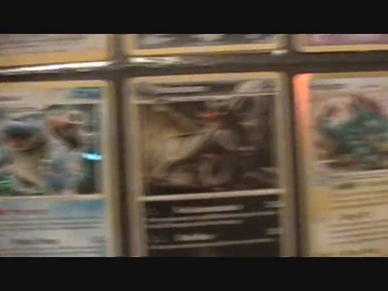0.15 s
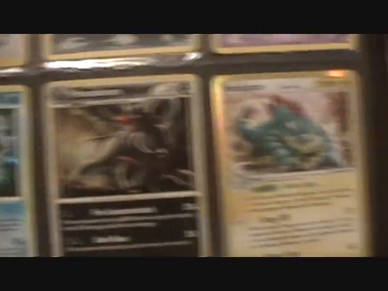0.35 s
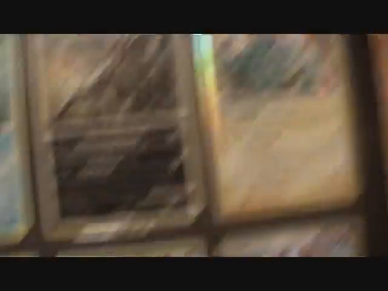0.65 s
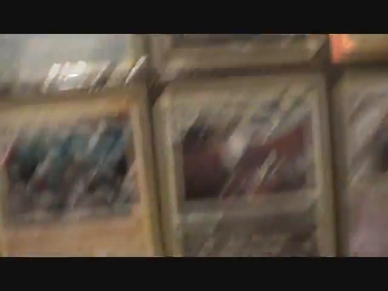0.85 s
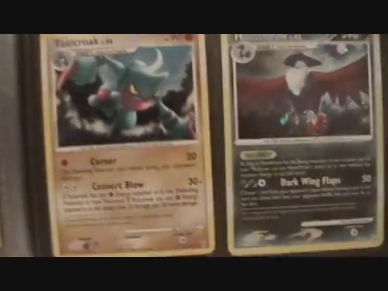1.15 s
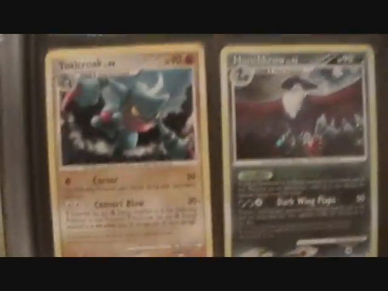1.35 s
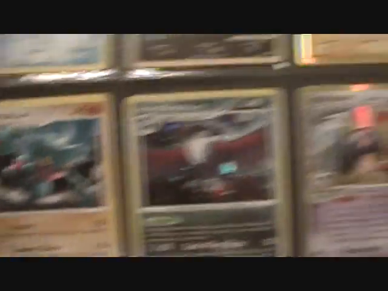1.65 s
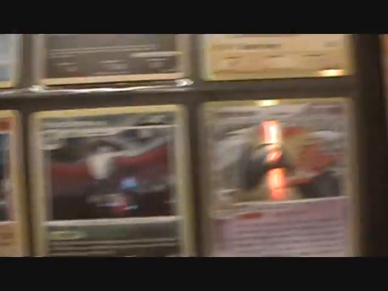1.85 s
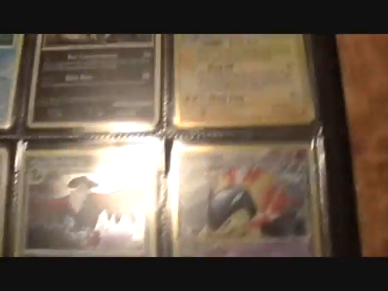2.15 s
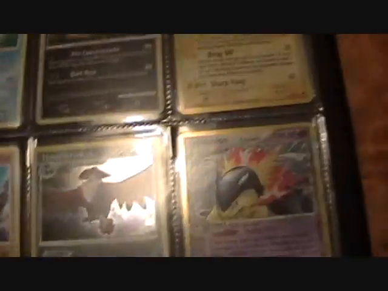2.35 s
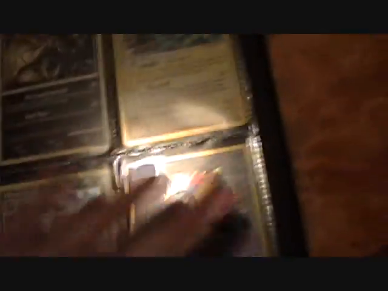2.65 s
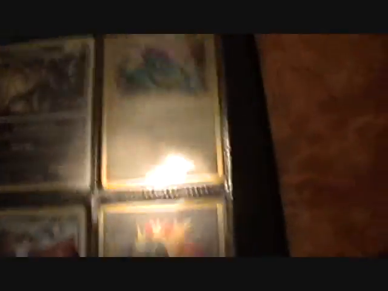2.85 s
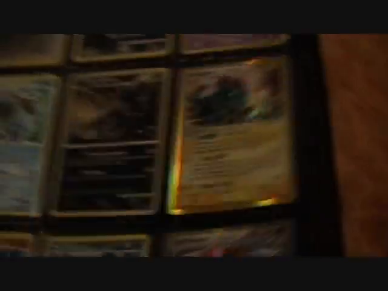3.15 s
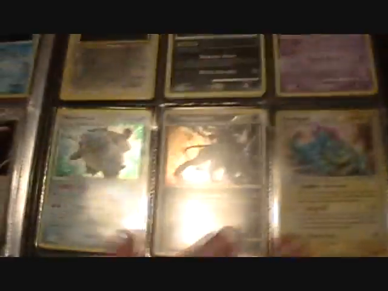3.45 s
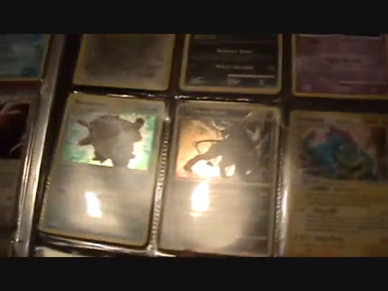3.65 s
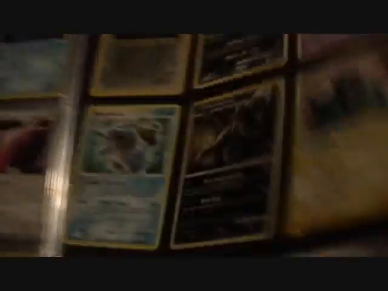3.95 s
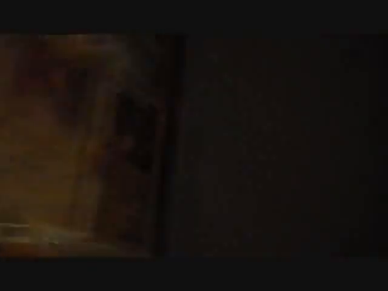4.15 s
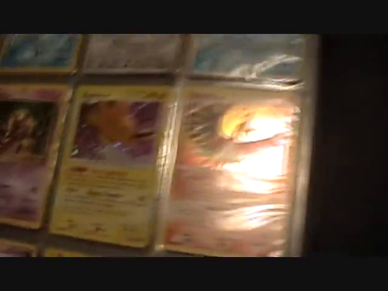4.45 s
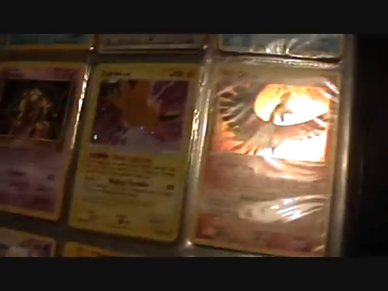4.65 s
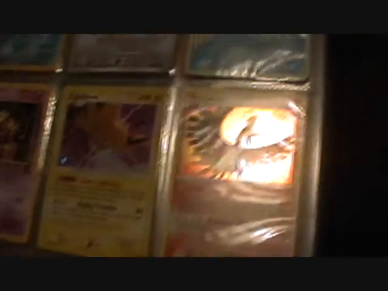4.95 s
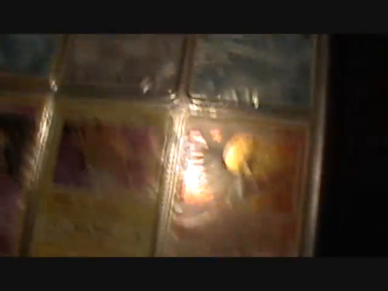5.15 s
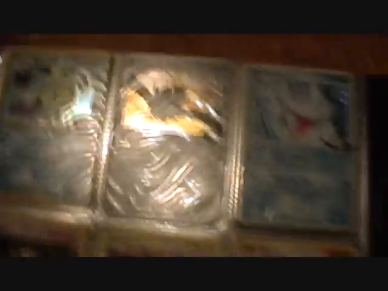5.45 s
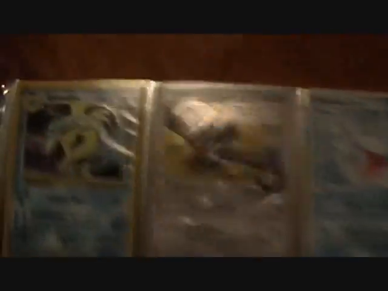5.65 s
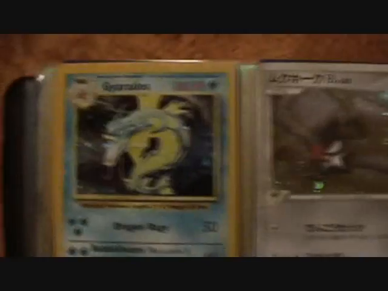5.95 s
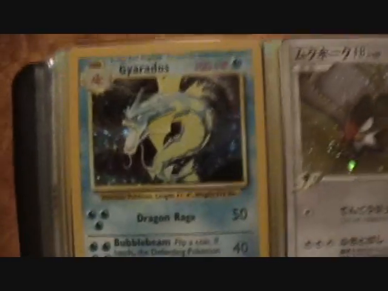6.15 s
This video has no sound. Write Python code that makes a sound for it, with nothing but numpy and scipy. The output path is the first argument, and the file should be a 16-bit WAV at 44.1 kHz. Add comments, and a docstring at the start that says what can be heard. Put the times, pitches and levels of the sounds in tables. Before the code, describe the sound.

Someone leafs through stiff plastic binder pages beside a small camera microphone. Continuous buzzy ticking and hiss lie under muffled handling knocks. After about two seconds of mostly bumps and light sliding, sleeves snap sharply and crinkle in bursts, pages landing with soft low thumps. The small dry room adds a short tail; the last rustles die away over the drive noise.

```python
"""A hand turns the plastic sleeve pages of a card binder in a quiet room, close to a hand-held tape camcorder.
From the start the tape drive whirs and ticks (filtered noise, sines, struck modes) while the grip rumbles and
bumps (lumpy noise, short wave packets). After 1 s a fingertip squeaks and a first sleeve snaps; fingers then
slide (dense grains). From 2.2 s to 5.3 s sleeves crinkle and snap (ringing buckles), and until 4.6 s pages drop
on the binder (damped modes). The last strokes and flexing fade before 6 s; drive and grip go on to the end."""
import sys
import numpy as np
from scipy import signal
from scipy.fft import rfft, irfft
from scipy.io import wavfile
from scipy.ndimage import uniform_filter1d

SR = 44100
rng = np.random.default_rng(int(sys.argv[2]) if len(sys.argv) > 2 else 0)


def generate_wav(signal):
    """Clip the signal to [-1, 1] and save it as 16-bit WAV at the path in sys.argv[1]."""
    frames = np.transpose(np.atleast_2d(signal))
    scaled = np.clip(frames, -1, 1) * 32767
    pcm = np.round(scaled).astype(np.int16)
    wavfile.write(sys.argv[1], SR, pcm)


N = 278403


def gain_of(db):
    """Decibel law: 20 dB is a factor of ten in amplitude."""
    return 10 ** (np.asarray(db) / 20)


def evened(x):
    """Power normalisation: scales to rms 1."""
    return x / np.sqrt(np.mean(x ** 2) + 1e-20)


def peaked(x):
    """Peak normalisation: scales to a largest excursion of 1."""
    return x / abs(x).max()


def read(points, hz):
    """Interpolation of a spectrum on a logarithmic frequency axis."""
    f, value = np.transpose(points)
    return np.interp(np.log(hz + 1), np.log(f + 1), value)


def level(rows, column):
    """Amplitude envelope: a dB column becomes gain over time, near silence outside the rows."""
    rows = np.asarray(rows)
    level_db = np.interp(np.arange(N) / SR, rows[:, 0], rows[:, column], left=-120, right=-120)
    return uniform_filter1d(gain_of(level_db), size=441)


def add(mix, s, sound):
    """Superposition: mixes a sound in at time s."""
    part = mix[..., round(max(s, 0) * SR):][..., :sound.shape[-1]]
    part += sound[..., :part.shape[-1]]


def resonate(x, hz, width):
    """Damped resonance: one complex pole, about unit gain at its peak; the bandwidth sets the decay."""
    r = np.exp(-np.pi * width / SR)
    return 2 * signal.lfilter([1 - r], [1, -r * np.exp(2j * np.pi * hz / SR)], x).real


def coloured(x, points):
    """Spectral shaping: weights each frequency, then sets rms 1."""
    gain = gain_of(read(points, np.fft.rfftfreq(x.shape[-1], 1 / SR)))
    return evened(irfft(rfft(x) * gain, x.shape[-1]))


# coherence of two close microphones: f/Hz, left-right correlation (0-1)
COHERENCE = [(60, 1), (500, 0.912), (2000, 0.4), (8000, 0.32)]


def pair(make):
    """Spatial coherence: two close microphones hear alike in the bass, less so in the treble."""
    mid, side = make(), make()
    same = np.clip(read(COHERENCE, np.fft.rfftfreq(N, 1 / SR)), 0, 1)
    side = irfft(rfft(side) * np.sqrt((1 - same) / (1 + same)), N)
    return np.array([mid + side, mid - side])


def grains(per_s, spread_db):
    """Shot noise: clicks at random times, a few of them large."""
    size = gain_of(spread_db * np.minimum(rng.exponential(1, N), 5))
    return size * rng.standard_normal(N) * (rng.random(N) < per_s / SR)


# reverberation time of the room: f/Hz, t60/s
ROOM_T60 = [(300, 0.39), (2000, 0.23), (12000, 0.1)]


def room(x):
    """Reverberation: sparse taps of random sign, each band dying exponentially at its own speed."""
    taps = np.zeros((2, SR // 2))
    at = np.arange(200, SR // 2 - 20, 20)
    at = at + rng.integers(0, 20, (2, len(at)))
    np.put_along_axis(taps, at, rng.choice([-1., 1.], at.shape), 1)
    hz, t, bands = signal.stft(taps, SR, nperseg=256)
    decay = gain_of(-60 * t / read(ROOM_T60, hz)[:, None])
    tail = signal.istft(bands * decay, SR, nperseg=256)[1]
    tail = tail + .8 * tail[::-1]  # the two sides share much of the tail
    return signal.fftconvolve(x, tail / np.linalg.norm(tail[0]), axes=1)[:, :N]


# spectrum of the steady hiss: f/Hz, relative level per Hz/dB
HISS_SPECTRUM = [(88, -45), (150, 1.0), (563, -1.0), (633, -15), (848, -4.5), (990, -20.0), (1180, -17),
                 (2000, -22), (2780, -18), (4700, -24), (15700, -30.0), (16000, -72)]
# fuzzy whistles of the tape drive: f/Hz, bandwidth/Hz, relative level/dB
HOUSING_MODES = [(580, 2.2, -6), (810, 22, -30), (1171, 4.1, -1.5), (1630, 140, 0.5), (2260, 34, -5.5),
                 (3500, 640, -1.5), (5800, 100, -9)]
# steady tones: f/Hz, rms level/dB
STEADY_TONES = [(59.2, -61.5), (15735, -82)]
# modes rung by each head touch: f/Hz, bandwidth/Hz, rms level/dB
TICK_MODES = [(570, 50, -62), (820, 100, -67), (1170, 60, -70), (2740, 130, -67), (3270, 250, -73),
              (3750, 260, -71), (4230, 300, -72)]
HISS_DB, HOUSING_DB = -54, -66.5
TOUCHES_HZ, FIRST_STRONG_S, WEAK_DB = 59.94, .0231, -5  # the second head touches more lightly
WHINE_HZ, WHINE_DB, WHINE_DEPTH = 13754, -82, .7  # rms level before the throb; depth 0-1


def camcorder():
    """Forced vibration: hiss, resonant whirring, tones and modes struck by two heads, strong then weak."""
    t = np.arange(N) / SR
    hiss = gain_of(HISS_DB) * pair(lambda: coloured(rng.standard_normal(N), HISS_SPECTRUM))
    noise = rng.standard_normal(N)
    whir = evened(sum(gain_of(db) * evened(resonate(noise, hz, width)) for hz, width, db in HOUSING_MODES))
    tones = sum(np.sqrt(2) * gain_of(db) * np.sin(2 * np.pi * hz * t) for hz, db in STEADY_TONES)

    touches = (t - FIRST_STRONG_S) * TOUCHES_HZ
    throb = 1 + WHINE_DEPTH * np.cos(np.pi * touches)  # once a drum turn, two touches
    whine = np.sqrt(2) * gain_of(WHINE_DB) * throb * np.sin(2 * np.pi * WHINE_HZ * t)

    touch = np.floor(touches).astype(int) + 2
    force_db = 1.5 * rng.standard_normal(touch.max() + 1)[touch] + WEAK_DB * (touch % 2)
    impact = np.diff(touch, prepend=touch[0])
    scrape = .03 * np.exp(-(touches % 1) / .1) * rng.standard_normal(N)
    knock = gain_of(force_db) * (impact + scrape)
    ticks = sum(gain_of(db) * evened(resonate(resonate(knock, hz, width), hz, 2 * width))
                for hz, width, db in TICK_MODES)
    return hiss + gain_of(HOUSING_DB) * whir + tones + whine + ticks


# hand shifting on the camera body: t/s, deep rumble level/dB, upper rumble level/dB
GRIP_LEVELS = [(0.0, -48, -49), (0.26, -50.5, -57), (0.37, -46.5, -55.5), (0.67, -56, -51),
               (0.79, -40, -49), (1.02, -52, -53), (1.23, -58, -58.5), (1.49, -48, -59), (1.67, -45.5, -57),
               (2.02, -50.5, -50), (2.35, -58, -44.5), (2.95, -56, -46.5), (3.41, -58, -44.5),
               (3.67, -76, -56), (3.95, -66, -53), (4.22, -41, -44), (4.32, -48, -45), (4.46, -49.5, -55),
               (4.73, -71, -57), (5.06, -63, -63), (5.34, -47.5, -49), (5.46, -39, -57), (5.82, -52, -49.5),
               (6.31, -44, -65)]
# grip bumps on the camera body: t/s, envelope peak level/dB, f/Hz at the peak
GRIP_BUMPS = [(0.034, -28, 204), (0.308, -19.5, 217), (0.607, -20.5, 139.5), (0.705, -26, 133.5),
              (0.811, -28, 218), (0.842, -24, 157), (1.028, -27.5, 141), (1.561, -14.5, 192),
              (1.614, -13.5, 128), (1.656, -20, 126), (1.764, -14.5, 224), (2.09, -27.5, 98.5),
              (2.223, -19, 290), (2.336, -26.5, 118), (2.461, -17.5, 320), (2.988, -35, 174),
              (3.203, -24.5, 163), (3.24, -28, 172), (3.418, -26, 182), (3.446, -28, 198),
              (4.268, -40, 420), (4.307, -22.5, 174), (4.406, -25, 287), (4.55, -25.5, 400),
              (4.718, -37, 109)]
LUMP_SPREAD_DB = 2.2  # how unequal the lumps of the upper rumble are


def grip():
    """Structure-borne sound: lumpy rumble and bumps of a few cycles carried through the camera body."""
    deep_spectrum = [(25, -41), (50, -9), (90, -16.0), (150, -24.5), (400, -81)]  # f/Hz, level/dB
    upper_spectrum = [(60, -17.5), (110, -2.5), (220, -4.5), (400, -6.0), (700, -52.5), (3000, -95.5)]
    deep = pair(lambda: coloured(rng.standard_normal(N), deep_spectrum))
    upper = pair(lambda: coloured(grains(900, LUMP_SPREAD_DB), upper_spectrum))
    out = level(GRIP_LEVELS, 1) * deep + level(GRIP_LEVELS, 2) * upper
    t = np.arange(N) / SR
    # rubbing around each bump, borrowed from the time-reversed rumble
    scuffle = sum(gain_of(db - 19.0) * np.exp(-abs(t - s - .01) / 0.023) for s, db, hz in GRIP_BUMPS)
    out += scuffle * upper[:, ::-1]
    for s, db, hz in GRIP_BUMPS:
        u = np.arange(-1.5, 4, hz / SR)  # time in cycles
        shape = np.where(u < 0, np.exp(-(u / 0.57) ** 2), np.exp(-(u / 0.39) ** 0.63))
        wave = np.sin(2 * np.pi * (u + 0.023) * (1 - 0.02 * u))  # pitch glides slightly down
        add(out, s, gain_of(db) * shape * wave)
    return out


# pages landing on the binder: t/s, peak level/dB, t60/s of the blow
PAGE_DROPS = [(2.232, -20.5, 0.23), (2.464, -14.5, 0.18), (3.5, -27.5, 0.12), (4.271, -20.5, 0.054),
              (4.551, -25.5, 0.19)]
# modes of the binder: f/Hz, bandwidth/Hz, relative level/dB
BINDER_MODES = [(310, 69, 13), (418, 119, 10.5), (515, 130, -22), (796, 160, -1)]


def drops():
    """Modal excitation: a soft uneven blow rings the damped modes of the binder."""
    out, t = np.zeros(N), np.arange(SR // 3) / SR
    for (s, db, t60), noise in zip(PAGE_DROPS, rng.standard_normal((len(PAGE_DROPS), len(t)))):
        blow = noise * gain_of(-60 * t / t60) * np.minimum(t / 0.0017, 1)
        ring = sum(gain_of(mode_db) * resonate(resonate(blow, hz, width), hz, 2 * width)
                   for hz, width, mode_db in BINDER_MODES)
        add(out, s, gain_of(db) * peaked(ring))
    return out


# a short rub: t/s, length/s, rms level/dB before its fades, modes (f/Hz, bandwidth/Hz, relative level/dB)
FINGER_SQUEAK = (1.02, 0.0336, -50.5, [(1450, 470, -1), (2260, 290, -6.5)])


def squeak():
    """Friction-driven resonance: a fingertip catches briefly on the plastic."""
    s, length, db, modes = FINGER_SQUEAK
    noise, out = rng.standard_normal(SR // 10)[:round(length * SR)], np.zeros(N)
    rub = evened(sum(gain_of(g) * resonate(resonate(noise, hz, width), hz, width) for hz, width, g in modes))
    add(out, s, gain_of(db) * rub * signal.windows.tukey(len(rub), .4))
    return out


# spectrum of crinkling plastic: f/Hz, relative level per Hz/dB
CRINKLE_SPECTRUM = [(500, 20.5), (900, 8), (2000, 9), (3600, 9.5), (5000, 0), (8000, -5.5), (12000, -46)]
# spectrum of skin sliding on plastic: f/Hz, relative level per Hz/dB
SLIDE_SPECTRUM = [(3000, 3.5), (5500, 6), (10000, 4), (13000, 3.5), (14200, -6.5), (15400, 7), (15900, -42)]
# strokes of fingers and pages over the plastic: t/s mid-rise, hold/s, crinkle level/dB, slide hiss level/dB
PLASTIC_STROKES = [(1.576, 0.065, -53, -79), (1.945, 0.21, -55, -48), (2.328, 0.094, -42, -58),
                   (2.384, 0.02, -39.5, -48), (2.431, 0.056, -46, -53), (2.831, 0.093, -68, -47),
                   (2.944, 0.083, -50, -53.5), (3.286, .04, -43.5, -52), (3.498, 0.027, -43.5, -52),
                   (3.688, 0.11, -75, -54), (4.22, 0.055, -75, -53), (4.413, 0.013, -40.5, -45.5),
                   (4.779, 0.077, -56, -62), (5.133, 0.11, -52.5, -56), (5.314, 0.033, -49, -55),
                   (5.381, 0.068, -46, -56), (5.503, 0.098, -53, -71)]
# pages flexing in the hand: t/s, crinkle level/dB
PAGE_FLEX = [(2.56, -84), (2.64, -60), (2.76, -60.5), (2.82, -63), (3.08, -67), (3.2, -61), (3.4, -55.5),
             (3.6, -59.5), (3.95, -60.5), (4.05, -60.5), (4.12, -57.5), (4.35, -57.5), (4.5, -67),
             (4.57, -56), (4.72, -56.5), (4.95, -61.5), (5.08, -63), (5.68, -65.5)]
FLEX_HISS_DB = -4.5  # the flexing pages also rub on each other; re crinkle level
STROKE_RISE_S, STROKE_FALL_S = 0.032, 0.038  # shortest rise; time constant of the fall
STROKE_SWELL = 0.38  # longer strokes swell in over this share of their hold as well
STROKE_SAG_DB = -1.5  # the hand slows through the hold
SETTLE_DB, SETTLE_S = -29, 0.03  # the sleeve crinkles on after a snap: level re snap, time constant
CATCH_DB, CATCH_S = 1, 0.013  # skin and plastic catch and let go: depth and time scale of the flutter


def rustle():
    """Buckling and friction: tiny buckles ring their patches; skin on plastic gives a bright hiss."""
    def buckles():
        """Each band of patches resonates to its own random impulses."""
        return sum(evened(resonate(grains(900, 2.5), hz, .15 * hz)) * np.sqrt(hz)
                   for hz in np.geomspace(800, 7000, 8))

    crinkle = pair(lambda: coloured(buckles(), CRINKLE_SPECTRUM))
    slide = pair(lambda: coloured(grains(15000, 1.9), SLIDE_SPECTRUM))
    airy = resonate(resonate(slide, 13300, 3000), 13300, 3000)
    t, flex = np.arange(N) / SR, level(PAGE_FLEX, 1)
    # powers add
    bend, speed = flex ** 2, (gain_of(FLEX_HISS_DB) * flex) ** 2
    for s, hold, crinkle_db, slide_db in PLASTIC_STROKES:
        rise = np.clip((t - s) / (STROKE_RISE_S + STROKE_SWELL * hold) + .5, 0, 1) ** 2
        sag = gain_of(STROKE_SAG_DB * np.clip((t - s) / hold, 0, 1) ** 2)
        shape = rise * sag * np.exp(-np.maximum(t - s - hold, 0) / STROKE_FALL_S)
        bend = bend + (gain_of(crinkle_db) * shape) ** 2
        speed = speed + (gain_of(slide_db) * shape) ** 2
    for s, db, *_ in SLEEVE_SNAPS:
        bend = bend + (gain_of(SETTLE_DB + db) * (t > s) * np.exp(-abs(t - s) / SETTLE_S)) ** 2
    flutter = evened(uniform_filter1d(rng.standard_normal((2, N)), round(CATCH_S * SR)))
    catch = gain_of(CATCH_DB * flutter)
    bend, speed = np.sqrt(bend) * catch[0], np.sqrt(speed) * catch[1]
    # the fastest strokes gain an airy top
    return bend * crinkle + speed * (slide + 2.8 * airy * speed / speed.max())


# sleeve snaps: t/s, patch peak level/dB before panning, f/Hz of the buckling patch,
# then re that level: treble tick level/dB, binder thud level/dB, whole sheet level/dB
SLEEVE_SNAPS = [(1.1854, -32.5, 2700, -8, -10, -23), (2.2288, -9, 1630, -32, 4, 1),
                (2.3614, -26, 1690, -31, -28, -7), (2.369, -29, 2140, -20, -9, -11),
                (2.4057, -29.5, 2840, -22, -26, 11), (2.414, -14, 3360, -38, -26, -33),
                (2.423, -27, 3500, -19, -24, -19), (2.4557, -23.5, 3000, 4, -33, 4),
                (2.836, -45, 2150, 20.5, -17, 15), (2.8779, -30.5, 2260, -19, -30, 10),
                (3.26, -38, 1500, -5, -23, 5), (3.27, -33.5, 1480, 3, -25, 7),
                (3.285, -28.5, 1480, -3, -20, -4), (3.292, -39, 2200, 1, -4, 12),
                (3.3228, -18, 2510, 6.5, 1.5, 13.5), (3.3952, -22.5, 1460, -4, -12, -2),
                (3.477, -34, 1590, -18, -20, -11), (3.493, -18, 1300, -25, -36, 8),
                (3.5024, -11.5, 1440, 1, -35, -29), (3.669, -32, 3780, 6, -16, 8.5),
                (3.6755, -34, 2330, 15, -6, -7), (3.7353, -40.5, 1800, -3, -21, -6),
                (3.8937, -41, 2190, -24, -26, 9), (3.9162, -38, 1310, -18, -24, 0),
                (3.926, -38.5, 1630, -33, -30, 12), (3.9424, -32, 1560, -30, -29, -1),
                (3.9535, -34.5, 1800, -20, -10, -1), (4.068, -45.5, 1150, -24, 19.5, -13),
                (4.196, -29, 2030, -37, 1, 16.5), (4.2363, -29.5, 2800, -24, 2, -4),
                (4.2493, -40.5, 2700, -27, 16, -10), (4.2663, -23, 1650, -32, 4, -18),
                (4.273, -19, 1500, -41, -34, 1), (4.386, -31.5, 2850, -4, -13, 3.5),
                (4.4153, -29, 980, -19, -11, 3), (4.4246, -30.5, 2440, 5.5, 0, 0),
                (4.433, -28.5, 2280, 3, 0, 8.5), (4.4528, -26.5, 2160, -15, -3, -4),
                (4.5533, -31, 1300, -31, 2, -2.5), (4.69, -43, 3270, -23, -20, 16.5),
                (5.186, -26.5, 3350, -42, -20, 15.5), (5.217, -27, 2180, -28, -37, 7.5),
                (5.3408, -46, 2910, 9, 11, 14.5)]
PAN_DB = 1.5  # the snaps lie a little to the left
SNAP_T60_S = 0.018  # the cluster of small buckles after a release dies in this time
TICK_AIR = 0.33  # airy top re the peak of a tick


def snaps():
    """Buckling instability: a sharp release amid smaller ones shakes patch, surrounding sheet and pages."""
    out, t = np.zeros((2, N)), np.arange(-400, 3600) / SR
    treble = signal.butter(2, [4500, 15500], "band", fs=SR, output="sos")
    pan = gain_of([[PAN_DB / 2], [-PAN_DB / 2]])
    release = t == 0
    burst = np.exp(np.minimum(t, 0) / .0012) * gain_of(-60 * np.maximum(t, 0) / SNAP_T60_S)
    noises = rng.standard_normal((len(SLEEVE_SNAPS), 3, len(t)))
    for (s, db, hz, tick_db, thud_db, sheet_db), noise in zip(SLEEVE_SNAPS, noises):
        cluster = .05 * (noise[0] + .2 * noise[1:]) ** 3  # cubing leaves few large buckles; sides nearly alike
        force = release + cluster * burst
        ring = lambda f, width: peaked(resonate(resonate(force, f, width), f, width))
        tick = peaked(signal.sosfilt(treble, release + 2 * cluster * burst ** 2))  # treble dies first
        tick = tick + TICK_AIR * peaked(resonate(tick, 12400, 1700))
        sound = ring(hz, 860) + gain_of(sheet_db) * ring(2190, 3680)
        sound = sound - gain_of(tick_db) * tick + gain_of(thud_db) * ring(572, 600)
        add(out, s - 400 / SR, gain_of(db) * sound * pan)
    return out


def scene():
    """Superposition of direct and reverberant sound: binder in the room over the camera's own sounds."""
    pages = snaps() + drops() + squeak()
    return pages + gain_of(-16) * room(pages) + rustle() + grip() + camcorder()


EDGE_HZ = 16800  # upper band limit


def record(dry):
    """Band limitation: the microphone drops the deepest bass; a steep low-pass ends the treble."""
    thin = signal.sosfilt(signal.butter(3, 42, "high", fs=SR, output="sos"), dry)
    low_pass = signal.firwin(511, EDGE_HZ, window=("kaiser", 9), fs=SR)
    return signal.oaconvolve(thin, low_pass[None], "same", axes=1)


dry = scene()
out = record(dry)
generate_wav(out)
```